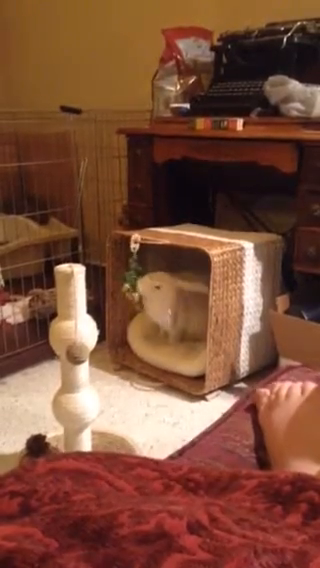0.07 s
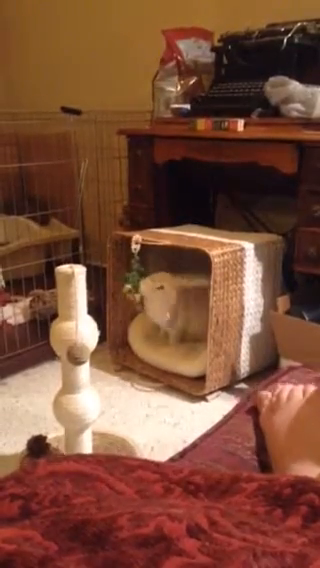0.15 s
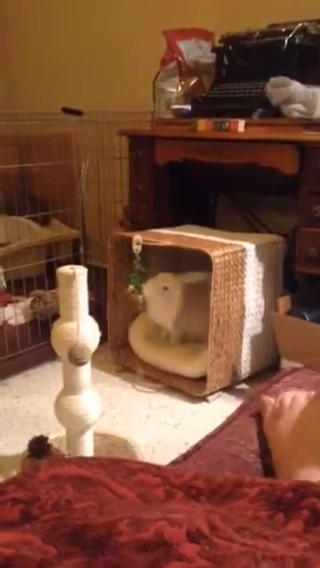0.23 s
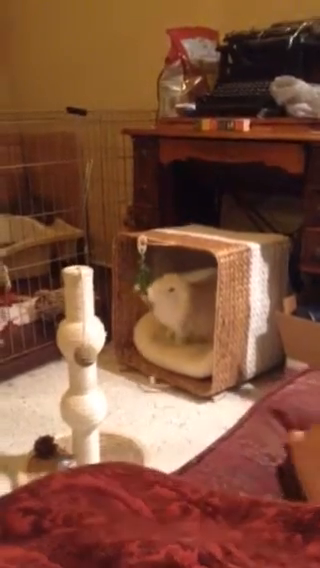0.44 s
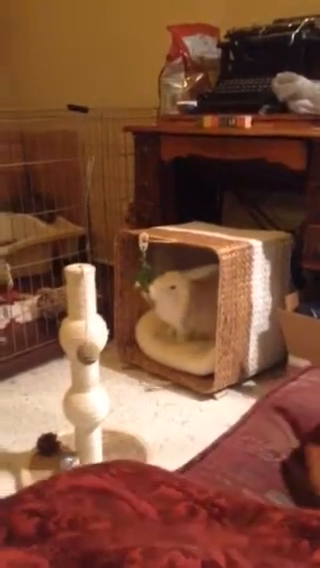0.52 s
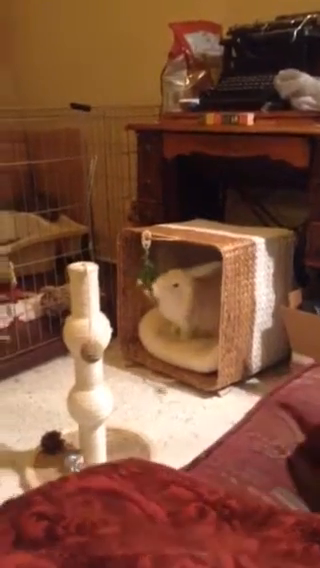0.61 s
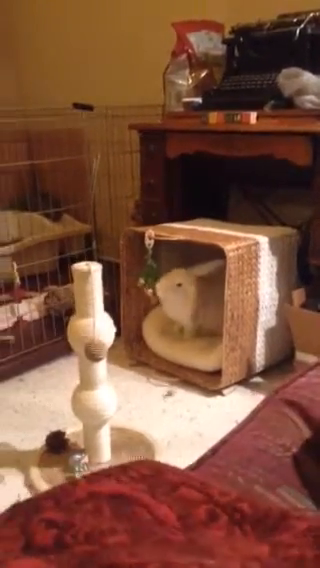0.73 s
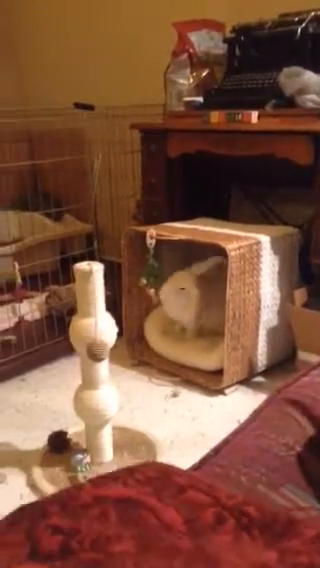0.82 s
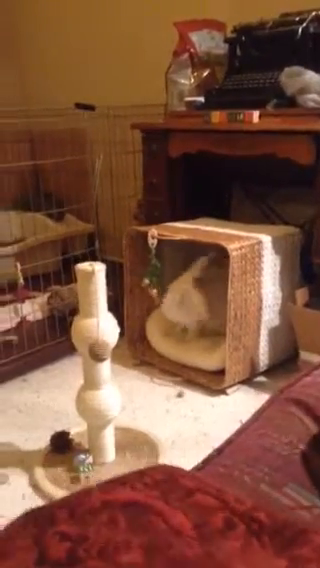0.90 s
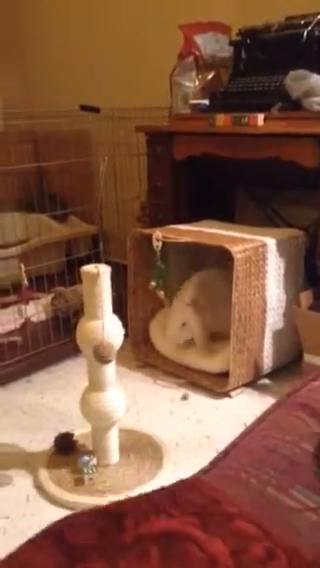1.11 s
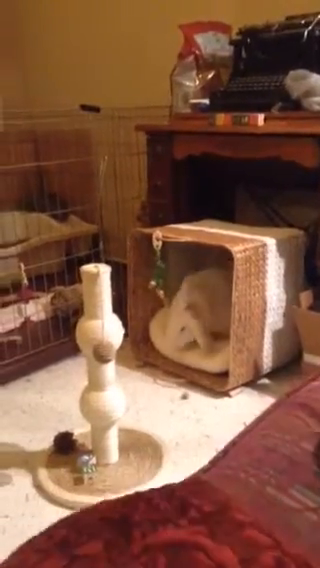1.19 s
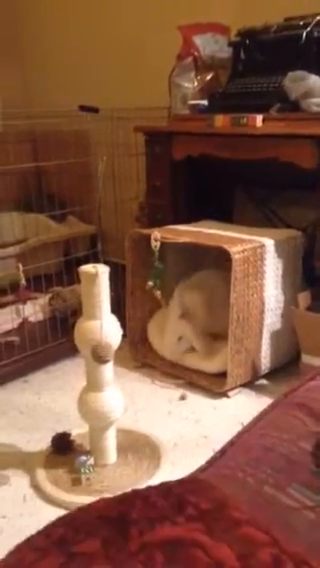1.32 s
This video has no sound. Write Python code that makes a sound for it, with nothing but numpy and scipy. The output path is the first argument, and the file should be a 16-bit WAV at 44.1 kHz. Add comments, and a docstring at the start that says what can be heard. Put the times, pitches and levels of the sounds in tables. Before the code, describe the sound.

A toy clicks and knocks on a hollow box, then a blanket softly slides.

```python
"""A sharp rattling click breaks the faint noise of a small room: a rabbit in a hollow play box tugs at
a hanging toy, and it lets go. The toy's hard parts crack and ring briefly; it knocks the box, exciting
its modes, and bumps it softly a few more times. Close by, a blanket slides over upholstery, its friction
making a soft swelling hiss, and weight shifts on padding in dull shuffles."""
import sys
import numpy as np
from scipy import signal
from scipy.fft import irfft
from scipy.io import wavfile

SR = 44100
rng = np.random.default_rng(int(sys.argv[2]) if len(sys.argv) > 2 else 0)


def generate_wav(signal):
    """Clip the signal to [-1, 1] and save it as 16-bit WAV at the path in sys.argv[1]."""
    frames = np.transpose(np.atleast_2d(signal))
    scaled = np.clip(frames, -1, 1) * 32767
    pcm = np.round(scaled).astype(np.int16)
    wavfile.write(sys.argv[1], SR, pcm)


N = 59535
T = np.arange(N) / SR


def from_db(db):
    """The decibel scale: 20 dB is a factor of ten in amplitude."""
    return 10 ** (np.asarray(db) / 20)


def rms_one(x):
    """Normalisation to unit rms."""
    return x / np.sqrt(np.mean(x ** 2) + 1e-20)


def noise(colour):
    """Random-phase synthesis: steady noise of rms 1, its spectrum given as rows of f/Hz, level/dB."""
    hz, db = np.transpose(colour)
    f = np.maximum(np.arange(N // 2 + 1) * SR / N, 1)
    gain = from_db(np.interp(np.log(f), np.log(hz), db))
    skirts = np.minimum(f / hz[0], 1) ** 2 * np.minimum(hz[-1] / f, 1) ** 2
    phases = np.exp(2j * np.pi * rng.random(len(f)))
    return rms_one(irfft(gain * skirts * phases, N))


def flutter(rate_hz):
    """Random modulation: slow noise of rms 1, mostly in the octave below rate_hz."""
    return noise([(rate_hz / 2, 0), (rate_hz, 0)])


def decay(start, t60):
    """Exponential decay: a jump to 1 at start, then a fall of 60 dB every t60 seconds."""
    return (T >= start) * from_db(-60 * np.maximum(T - start, 0) / t60)


def reverberation(start, t60, build_s):
    """Envelope of a diffuse field: reflections build up, then are absorbed."""
    return decay(start, t60) * (1 - np.exp(-np.maximum(T - start, 0) / build_s))


def ringing(modes, start):
    """Modal superposition: damped sines of alternating sign, their levels varying a little per blow."""
    out = np.zeros(N)
    for k, (hz, db, t60) in enumerate(modes):
        amplitude = (-1) ** k * from_db(db + 0.5 * rng.normal())
        out += amplitude * decay(start, t60) * np.sin(2 * np.pi * hz * (T - start))
    return out


def soft_contact(x, cutoff_hz):
    """A yielding contact spreads the force over time and so acts as a low-pass."""
    return signal.sosfilt(signal.butter(2, cutoff_hz, fs=SR, output="sos"), x + 1e-18)


def room_noise():
    """Stationary background noise, strongest at low frequencies."""
    # spectrum of the quiet room: f/Hz, level/dB
    spectrum = [(55, -21), (80, -16), (115, -7.5), (160, 1), (260, 1), (500, -5.5), (1000, -10.5),
                (3000, -20), (7000, -21), (15000, -21)]
    return from_db(-64) * noise(spectrum)


def shuffles():
    """Weight shifts on padding: dull noise, amplitude-modulated by Gaussian swells."""
    # swells: t/s, level/dB, half length/s
    swells = [(0.156, -72, 0.041), (0.585, -59.5, 0.018), (0.944, -61, 0.028), (1.314, -61.5, 0.018)]
    # spectrum of the padding: f/Hz, level/dB
    spectrum = [(70, -29), (150, -9), (220, 5), (330, -4.5), (700, -11.5), (2000, -42)]
    envelope = sum(from_db(db) * np.exp(-((T - t) / half) ** 2) for t, db, half in swells)
    return envelope * noise(spectrum)


def moving_resonance(x, centre_hz, width_hz, block=128):
    """A two-pole resonator, retuned block by block; the output has rms 1."""
    out, state = np.zeros(N), np.zeros(2)
    radius = np.exp(-np.pi * width_hz / SR)
    for i in range(0, N, block):
        feedback = [1, -2 * radius * np.cos(2 * np.pi * centre_hz[i] / SR), radius ** 2]
        out[i:i + block], state = signal.lfilter([1, 0, -1], feedback, x[i:i + block], zi=state)
    return rms_one(out)


def blanket():
    """Sliding friction: a dull rub whose peak rises and stands out with speed, and the hiss of fibres."""
    # course of the slide: t/s, rub level/dB, fibre level/dB, rub centre f/Hz
    slide = [(0, -116, -107, 494), (.2, -70.5, -82, 497), (.33, -59.5, -64, 510), (.53, -59.5, -63, 597),
             (.69, -62, -67.5, 520), (.87, -60, -65, 610), (.95, -57.5, -62, 710), (1.01, -56, -61, 870),
             (1.10, -57, -58.5, 890), (1.205, -62.5, -61.5, 563), (1.262, -73, -73, 547),
             (1.35, -73.5, -67.5, 500)]
    # spectrum of the rub: f/Hz, level/dB
    rub_spectrum = [(60, -26), (120, -15.5), (210, 0), (400, -6), (800, -6.5), (1400, -8.5), (2500, -12.5),
                    (5000, -19.5)]
    # spectrum of the fibre hiss: f/Hz, level/dB
    fibre_spectrum = [(500, 3), (1500, -33), (3000, -3), (5500, -2), (9000, 0.5), (12500, 1.5),
                      (15000, 0.5)]
    times, *columns = np.transpose(slide)
    rub_db, fibre_db, centre_hz = [np.interp(T, times, column) for column in columns]
    broad = noise(rub_spectrum)
    peak = moving_resonance(noise(rub_spectrum), centre_hz, width_hz=300)
    peak_gain = from_db(rub_db + 58)  # the peak dominates once the rub exceeds -58 dB
    blend = (broad + peak_gain * peak) / np.hypot(1, peak_gain)
    rub = from_db(rub_db + 0.5 * flutter(rate_hz=40)) * blend
    hiss = from_db(fibre_db + 0.5 * flutter(rate_hz=170)) * noise(fibre_spectrum)
    return rub + hiss


def box_knocks():
    """Impact excitation: knocks ring the box and the room; soft ones reach only the low modes."""
    # knocks on the box: t/s, excitation level/dB, contact cutoff f/Hz
    knocks = [(0.2227, -40.5, 2000), (.2290, -36.5, 1350), (.2480, -39.5, 760), (.2860, -46.5, 920),
              (.2935, -39.5, 320), (.3580, -49, 1210), (0.3614, -35.5, 257), (0.385, -42.5, 247),
              (0.4108, -47, 297), (0.459, -56, 275)]
    # modes of the box: f/Hz, relative level/dB, t60/s
    modes = [(146, -22, 0.74), (229, -3.5, 0.44), (253.8, 0, .24), (352, -9, 0.15), (436.8, -5, 0.29),
             (483, 0, 0.067), (586, 1, 0.062), (632, -1, 0.078), (748, -4, 0.1), (949, -4, 0.093),
             (1028, -10.5, 0.14), (1215, -29, 0.071), (1720, -8.5, 0.13), (1830, -14, 0.095)]
    # spectrum of the reverberation: f/Hz, level/dB
    room_spectrum = [(70, -23), (120, -17), (170, -8), (240, -6.5), (500, 1), (900, -8), (1500, -11),
                     (2600, -12.5), (5000, -19)]
    out = np.zeros(N)
    next_touches = [knock[0] for knock in knocks[1:]] + [N / SR]
    for (t, db, cutoff_hz), touch in zip(knocks, next_touches):
        damping = (T < touch) + decay(touch, t60=0.051)  # the next touch stops the ring
        room = from_db(-2) * reverberation(t, t60=0.2, build_s=0.0039) * noise(room_spectrum)
        out += from_db(db) * soft_contact(ringing(modes, t) * damping + room, cutoff_hz)
    return out


def toy_clicks():
    """Brief, hard contacts radiate a wide band: bright cracks, each with a short ring and room tail."""
    # collisions of the toy's parts: t/s, crack level/dB, crack t60/s, ring level/dB
    clicks = [(.2221, -36, .009, -42), (.2229, -33, .0065, -34), (.2294, -38, .008, -43),
              (.2355, -35.5, .003, -50), (.2423, -38, .003, -45)]
    # spectrum of a crack: f/Hz, level/dB
    spectrum = [(600, -3), (1300, -0.5), (1900, 5), (3200, -4.5), (5000, -8), (8000, -4), (11500, -2.5),
                (15000, -5.5)]
    # modes of the toy: f/Hz, relative level/dB, t60/s
    modes = [(1704, -16, .04), (1937, -7.5, 0.036), (2287, -11.5, 0.025)]
    out = np.zeros(N)
    for t, crack_db, t60, ring_db in clicks:
        room = from_db(-14.5) * reverberation(t, t60=0.18, build_s=0.0056)
        envelope = np.hypot(decay(t, t60), room)  # direct and diffuse sound add in power
        crack = from_db(crack_db) * envelope * noise(spectrum)
        out += crack + from_db(ring_db) * ringing(modes, t)
    return out


def scene():
    """Superposition: the sources add, the same in both ears, and are heard from the middle."""
    mid = room_noise() + shuffles() + blanket() + box_knocks() + toy_clicks()
    return np.array([mid, mid])


def record(dry):
    """Band limiting: a small microphone loses the bass, and the top is cut steeply."""
    low_cut = signal.butter(4, 68, "high", fs=SR, output="sos")
    high_cut = signal.ellip(12, 0.1, 70, 15350, fs=SR, output="sos")
    return signal.sosfilt(high_cut, signal.sosfilt(low_cut, dry))


dry = scene()
out = record(dry)
generate_wav(out)
```